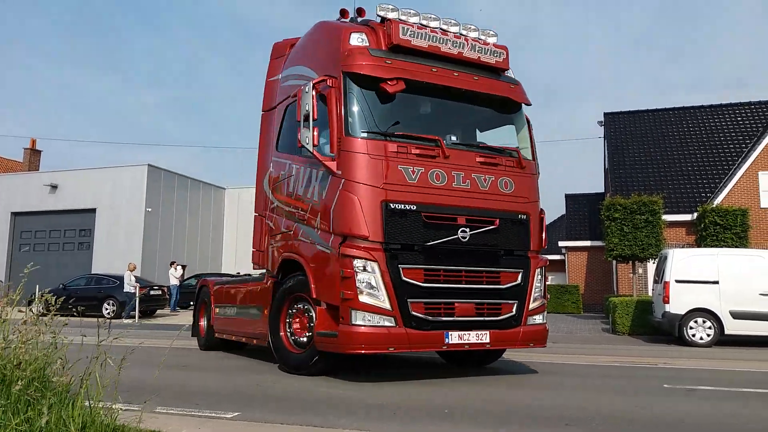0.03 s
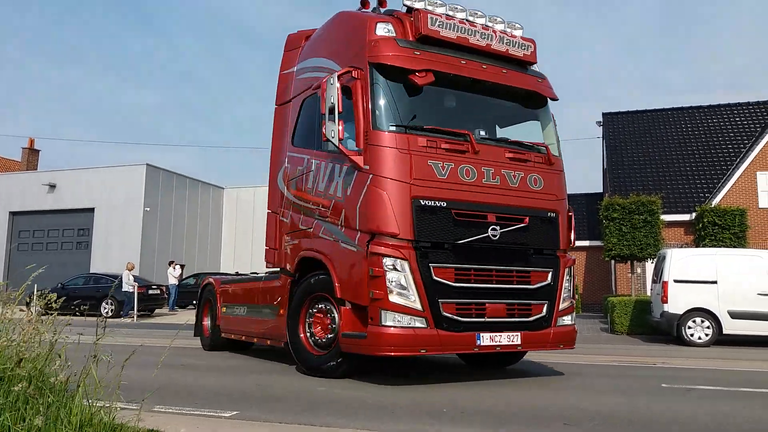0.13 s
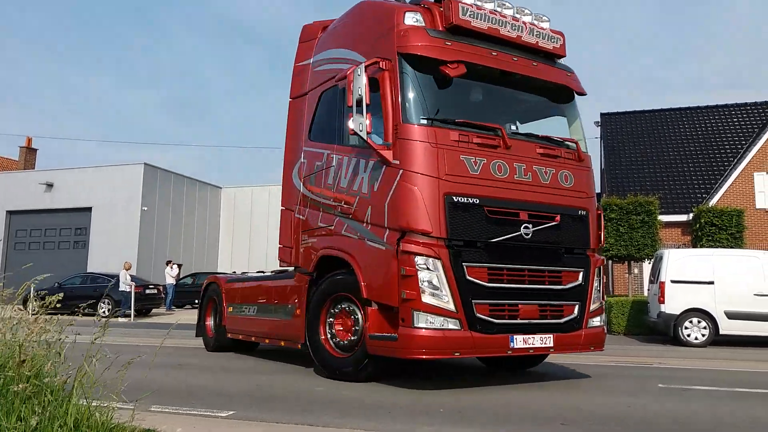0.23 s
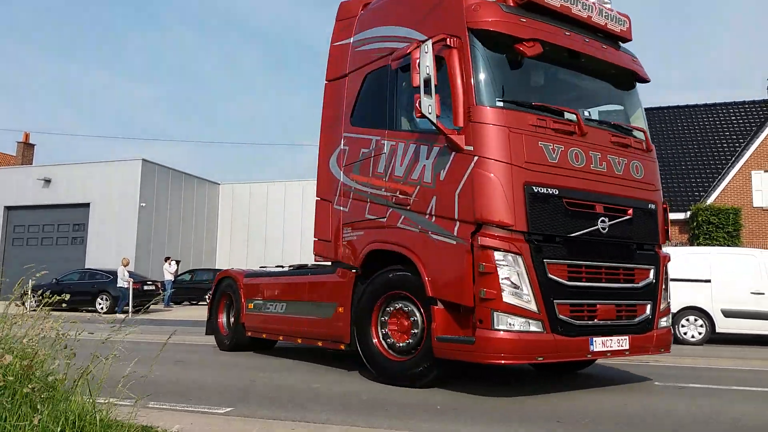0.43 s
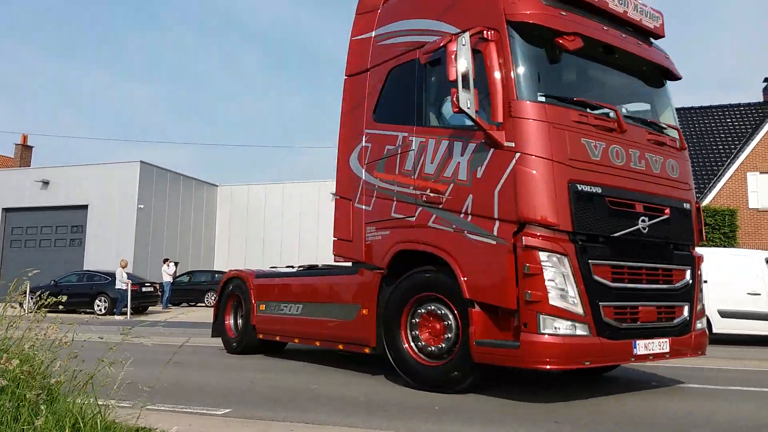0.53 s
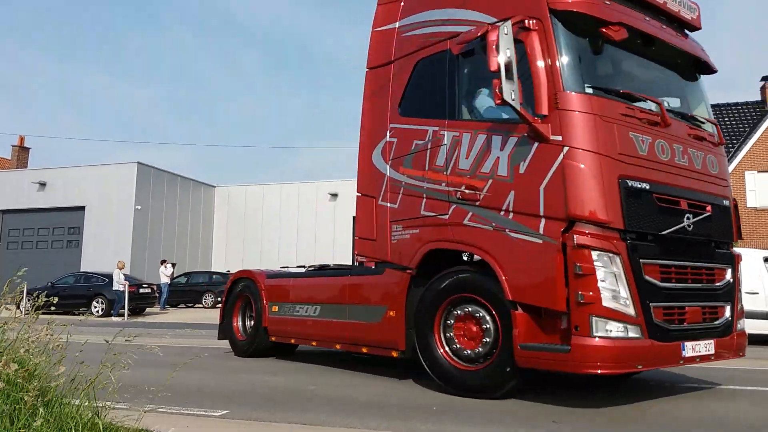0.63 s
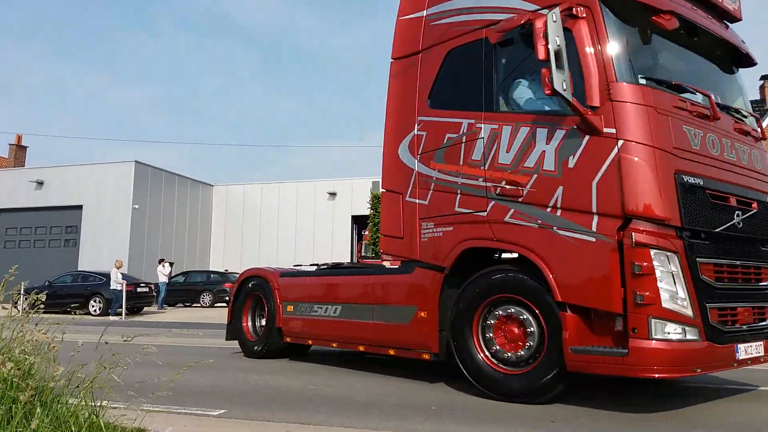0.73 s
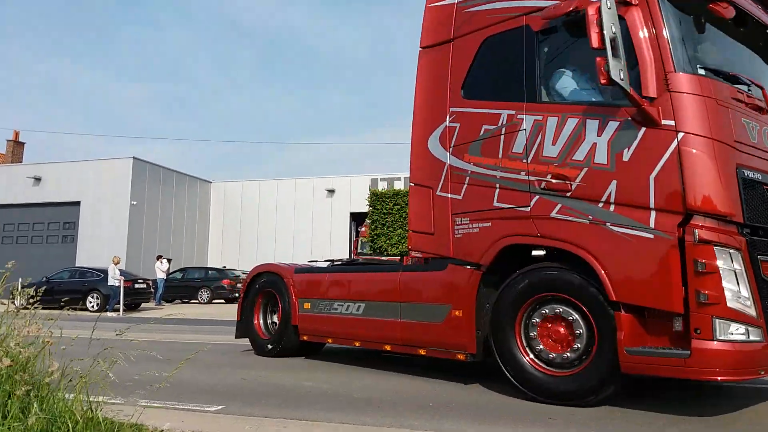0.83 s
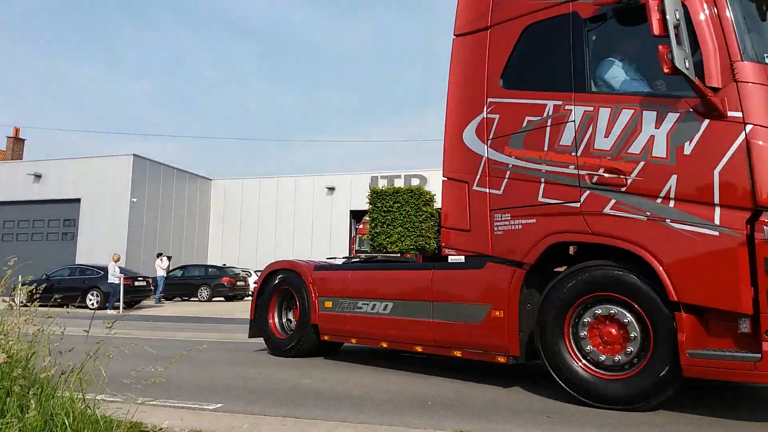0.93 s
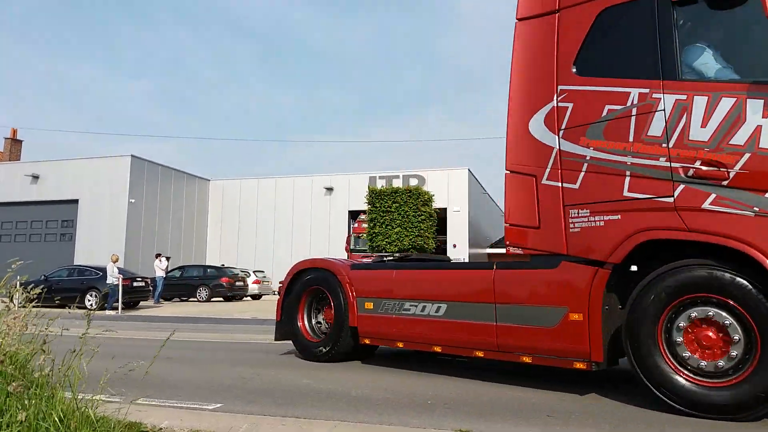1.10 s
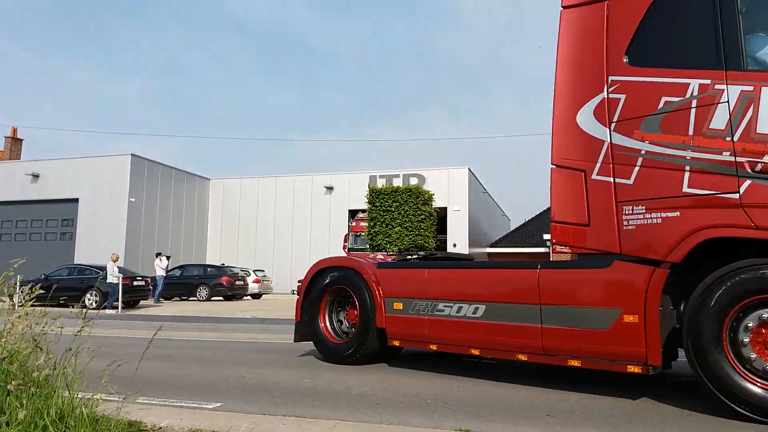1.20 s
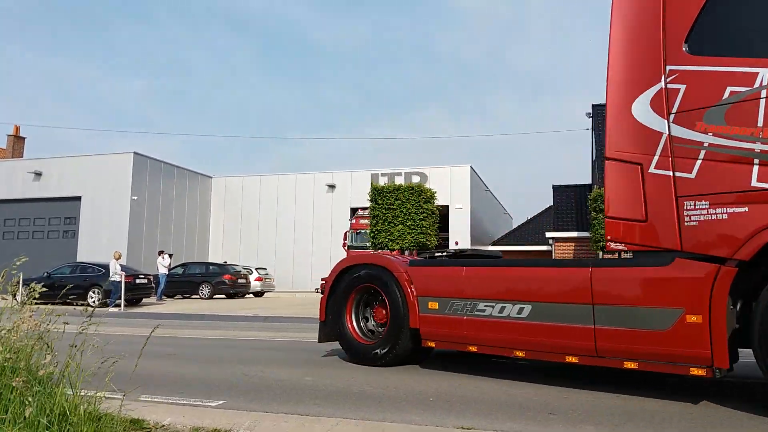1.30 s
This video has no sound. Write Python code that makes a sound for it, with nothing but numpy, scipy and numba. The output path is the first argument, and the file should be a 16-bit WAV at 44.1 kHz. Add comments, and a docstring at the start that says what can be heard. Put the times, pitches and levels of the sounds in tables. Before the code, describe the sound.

A truck air horn dominates: after 0.2 seconds of diesel throb, tyre roar and faint whine, a tiny air hiss leads into one loud, low-pitched, brassy blast. It surges unevenly, fades from about 0.7 and stops near 0.84, with short wall echoes. Engine and tyre noise, ducked by the blast, return until 1.35, with low wind thumps buffeting the close outdoor microphone from about 0.5.

```python
"""Air horn of a rolling lorry

A lorry sounds its horn close by: one reed near 263 Hz, its air pressure surging three times.
Partials are summed, the high ones growing fastest with pressure; echoes off nearby walls beat with them.
Diesel and tyres are shaped noise throbbing with the firings, under a few wavering sines of whine.
Wind bumps the microphone as low noise, and the recorder turns itself down for the blast."""
import sys
import numpy as np
from scipy import signal
from scipy.fft import rfft, irfft
from scipy.io import wavfile
from scipy.ndimage import map_coordinates
from numba import njit

SR = 44100
rng = np.random.default_rng(int(sys.argv[2]) if len(sys.argv) > 2 else 0)


def output_pcm(signal):
    """Save a mono or channel-first signal as 16-bit PCM at the path in sys.argv[1].

    Samples are clipped to [-1, 1] before scaling.
    """
    pcm = np.clip(np.atleast_2d(signal).T, -1, 1) * 32767
    wavfile.write(sys.argv[1], SR, np.round(pcm).astype(np.int16))


N = 59535  # samples, 1.35 s
TOP_HZ = 15700  # highest horn partial, and where the recorder cuts the treble


def undb(db):
    """Decibels to gain."""
    return 10 ** (np.asarray(db) / 20)


def unit(x):
    """Scale to rms 1."""
    return x / np.sqrt(np.mean(x ** 2))


def curve(table, at):
    """Straight lines through the rows of a two-column table."""
    return np.interp(at, *np.array(table).T)


def band(x, hz, kind="bandpass", order=2):
    """Butterworth filter."""
    return signal.sosfilt(signal.butter(order, np.clip(hz, 10, .45 * SR), kind, fs=SR, output="sos"), x)


def hiss(hz, order=2):
    """White noise through a bandpass, at rms 1."""
    return unit(band(rng.standard_normal(N), hz, order=order))


def noise(spectrum):
    """Noise of rms 1 shaped by (frequency [Hz], level [dB]) points, joined over log frequency."""
    hz, db = np.array(spectrum).T
    bins = np.maximum(np.fft.rfftfreq(N, 1 / SR), 1)
    shape = undb(np.interp(np.log(bins), np.log(hz), db))
    return unit(irfft(rfft(rng.standard_normal(N)) * shape, N))


def walk(hz):
    """Random wander of rms 1, no faster than about hz."""
    settled = band(rng.standard_normal(2 * N), hz, "lowpass")[N:]
    return unit(settled)


def swell(t, at, length):
    """A bell-shaped rise and fall; length is its standard deviation."""
    return np.exp(-.5 * ((t - at) / length) ** 2)


def decay(t, t60_s):
    """Exponential fade of 60 dB in t60_s seconds."""
    return np.exp(-np.log(1000) * t / t60_s)


@njit
def follow(x, attack, release):
    """Envelope that rises quickly and sinks slowly."""
    out, e = np.empty(len(x)), 0.
    for i in range(len(x)):
        e += (x[i] - e) * (attack if x[i] > e else release)
        out[i] = e
    return out


def horn(t):
    """The reed pulses the pipe once a cycle; high partials and breath grow fastest with pressure."""
    # air pressure at the reed: (time [s], level [dB])
    pressure_points = [(0.205, -64.5), (0.226, -18), (0.24, -14.5), (0.25, -4.5), (0.262, -4.5),
                       (0.272, -1), (0.335, 0), (0.405, -5), (0.46, 1.5), (0.51, 0.5), (0.57, -2),
                       (0.605, 0.5), (0.655, -0.5), (0.71, -5.5), (0.765, -10.5), (0.8, -13), (0.84, -90)]
    # pitch of the reed: (time [s], frequency [Hz])
    pitch_points = [(0.235, 258.5), (0.255, 269.4), (0.275, 262.8), (0.3, 261), (0.35, 262), (0.42, 266.2),
                    (0.47, 261), (0.51, 260.8), (0.56, 263.5), (0.61, 262.7), (0.66, 259.6), (0.72, 262.78),
                    (0.79, 265.4)]
    # partials of the flared pipe at 0 dB pressure: (multiple of the pitch, level [dB])
    partials = [(1, -2), (2, -7), (3, 6.5), (4, 5), (5, -1.5), (6, -0.5), (7, 4), (8, 2), (9, -3.5),
                (10, -4.5), (11, -6), (12, -3.5), (13, 0), (14, 0), (15, -12), (16, -4.5), (17, -14.5),
                (18, -14), (19, -39.5), (20, -20.5)]
    # brassy edge above those partials: (frequency [Hz], level [dB])
    edge = [(5500, -25), (6300, -32), (8000, -37), (11000, -35.5), (13000, -50), (15500, -55)]
    # wavering of the low partials:
    # (time [s], first [dB], second [dB], third [dB], fourth [dB])
    low_levels = [(0.24, -1, 1.5, -1.5, 6), (0.275, -1.5, 1, -10, -5), (0.333, -11.5, -1, 0, 3),
                  (0.409, 0, -3, 10, 7), (0.479, 1, 1, -6.5, -1.5), (0.6, 1, 1, -3.5, 1.5),
                  (0.691, 2, 7, 5.5, -2.5), (0.745, -7, 11.5, 0.5, 2), (0.79, -11.5, 8.5, 1.5, 7.5)]
    bloom_base, bloom_per_octave = 0.49, 0.73  # dB of a partial per dB of pressure
    bloom_top = 26  # partials above this multiple swell together
    pipe_spread_s = 0.000578  # the highest partials leave the bell this much later
    horn_db, air_db = -7.5, -33  # air_db is relative to the partials

    pressure_db = curve(pressure_points, t)
    hz = curve(pitch_points, t)
    rattle = 0.0033 * swell(t, 0.294, 0.02)  # the reed rattles before it settles
    jitter = (0.0009 + rattle) * walk(126)
    phase = 2 * np.pi * np.cumsum(hz * (1 + jitter)) / SR

    mean_hz = hz.mean()
    multiples = np.arange(1, TOP_HZ // mean_hz + 1)
    edge_levels = curve(edge, multiples[len(partials):] * mean_hz)
    levels = np.concatenate([np.array(partials)[:, 1], edge_levels])

    # the pipe's resonances delay the partials as a causal filter does
    mirrored = np.log(undb(np.concatenate([levels[:1], levels, levels[-2::-1]])))
    lags = signal.hilbert(mirrored).imag[1:len(levels) + 1]
    later_s = pipe_spread_s * np.minimum(multiples / len(partials), 1)
    lags = lags + np.cumsum(2 * np.pi * mean_hz * later_s)

    times, *columns = np.array(low_levels).T
    waver = {k + 1: np.interp(t, times, column) for k, column in enumerate(columns)}
    tone = np.zeros(N)
    for k, db, lag in zip(multiples, levels, lags):
        bloom = bloom_base + bloom_per_octave * np.log2(min(k, bloom_top))
        level_db = db + waver.get(k, 0) + pressure_db * bloom
        tone += undb(level_db) * np.cos(k * phase - lag)

    breath = hiss((600, 9000), order=1) * (1 + np.cos(phase))  # puffs once a cycle
    return undb(horn_db) * (tone + breath * undb(air_db + 2 * pressure_db))


def valve(t):
    """Air hisses through the pipe just before the reed speaks."""
    return hiss((2200, 4980), order=6) * swell(t, 0.225, 0.016) * undb(-36)


def yard(x, t):
    """Wall echoes whose paths change as the lorry rolls, bright scatter and a thin tail from buildings."""
    # echoes from nearby walls:
    # (delay at mid blast [s], change of delay [ms per s], level [dB])
    echo_paths = [(0.0303, -4, -12), (0.0308, -4.5, -7), (0.0383, -1, -7.5), (0.05053, -10, -8.5)]
    mid_blast_s = 0.5
    tail_db, tail_t60_s, tail_hz = -13.5, 0.4, (417, 2930)
    # bright scatter off the cab and the house fronts
    scatter_db, scatter_t60_s, scatter_low_hz = 4.5, 0.4, 5770

    dull = band(x, 5000, "lowpass", order=3)
    echoes = np.zeros(N)
    for delay, drift, db in echo_paths:
        heard_s = t - delay - drift * (t - mid_blast_s) / 1000
        echoes += undb(db) * map_coordinates(dull, [heard_s * SR])

    tail = band(rng.standard_normal(N), tail_hz) * decay(t, tail_t60_s)
    tail = tail * (t > .02)  # the buildings answer after 20 ms
    scatter = rng.standard_normal(N) * decay(t, scatter_t60_s)
    scatter = band(scatter / np.linalg.norm(scatter), scatter_low_hz, "highpass", order=4)
    diffuse = undb(tail_db) * tail / np.linalg.norm(tail) + undb(scatter_db) * scatter
    return x + echoes + signal.fftconvolve(x, diffuse)[:N]


def lorry(t):
    """Tyre and diesel noise that throbs with the firings, engine and gear whine, one tiny spit of air."""
    # spectrum of diesel and tyres: (frequency [Hz], relative level per Hz [dB])
    roll_spectrum = [(25, -44), (62, 1), (105, -1), (270, -7), (400, -7), (680, -4.5), (850, -12),
                     (990, -3.5), (1250, -11.5), (1850, -10.5), (3100, -22), (4300, -25.5), (5000, -39),
                     (6000, -52.5), (11000, -51.5), (15000, -54)]
    # their level: (time [s], level [dB])
    roll_level = [(0, -29.5), (0.19, -28.5), (0.22, -26), (0.3, -38.5), (0.9, -25.5), (1.35, -28.5)]
    # engine and gear whine at the start: (frequency [Hz], level [dB])
    whine_lines = [(393, -38.5), (587, -41.5), (684, -44.5), (980, -36), (1050, -39.5), (1830, -43)]
    firing_hz, firing_wander, knock_depth = 36.06, 0.021, 0.19
    whine_wander, whine_fade_db_per_s = 0.0074, -10

    firing = 2 * np.pi * np.cumsum(firing_hz * (1 + firing_wander * walk(18))) / SR
    roll = noise(roll_spectrum) * (1 + knock_depth * np.cos(firing)) * undb(curve(roll_level, t))

    whine = np.zeros(N)
    for hz, db in whine_lines:
        phase = 2 * np.pi * np.cumsum(hz * (1 + whine_wander * walk(40))) / SR
        whine += undb(db) * np.sqrt(2) * np.sin(phase)

    spit = hiss((8600, 11800)) * swell(t, 0.152, 0.012) * undb(-55.5)
    return roll + whine * undb(whine_fade_db_per_s * t) + spit


def wind(t):
    """Wind on the microphone: a low rumble that sets in, with short buffets of low noise."""
    # buffets: (time [s], length [s], level [dB])
    gusts = [(0.497, 0.06, -27.5), (0.554, 0.011, -18.5), (0.681, 0.019, -15), (0.817, 0.068, -25),
             (0.901, .02, -30), (1.045, 0.023, -18), (1.107, 0.011, -22.5), (1.196, 0.035, -19.5),
             (1.32, 0.011, -18)]
    rumble_from_s, rumble_rise_s, rumble_db = 0.32, 0.036, -29

    buffets = sum(undb(db) * swell(t, at, length) for at, length, db in gusts)
    rumble = undb(rumble_db) * np.clip((t - rumble_from_s) / rumble_rise_s, 0, 1)
    return buffets * hiss((69.5, 269)) + rumble * hiss((52.4, 100))


def scene():
    """Horn among its echoes, valve, lorry and wind at one microphone."""
    t = np.arange(N) / SR
    return (yard(horn(t), t) + valve(t) + lorry(t) + wind(t))[None]


def record(dry):
    """Gain control ducks for the horn and recovers slowly; peaks are rounded, deep bass and top are cut."""
    threshold_db, ratio, attack_s, release_s = -8, 3.01, 0.0017, 1.0
    ceiling, low_cut_hz = 1.17, 39

    envelope = follow(np.abs(dry[0]), 1 / (attack_s * SR), 1 / (release_s * SR))
    gain = np.maximum(envelope / undb(threshold_db), 1) ** (1 / ratio - 1)
    rounded = ceiling * np.tanh(dry * gain / ceiling)
    lean = band(rounded, low_cut_hz, "highpass", order=3)
    top_cut = signal.ellip(10, .2, 70, TOP_HZ, fs=SR, output="sos")  # 0.2 dB ripple, 70 dB stop
    return signal.sosfilt(top_cut, lean)


dry = scene()
out = record(dry)
output_pcm(out)
```